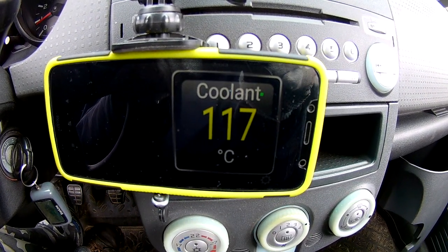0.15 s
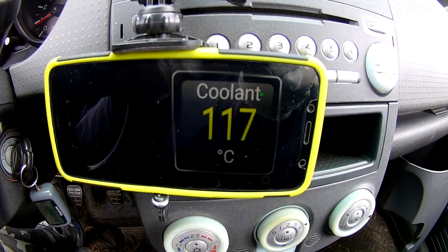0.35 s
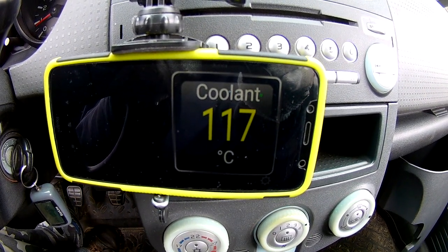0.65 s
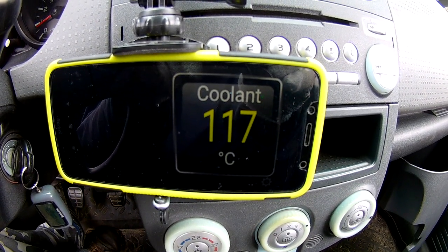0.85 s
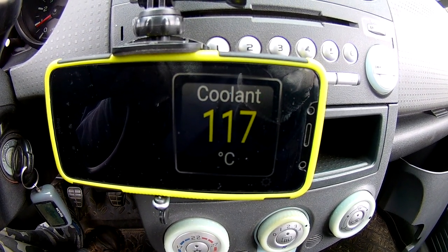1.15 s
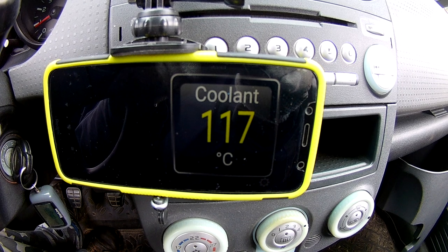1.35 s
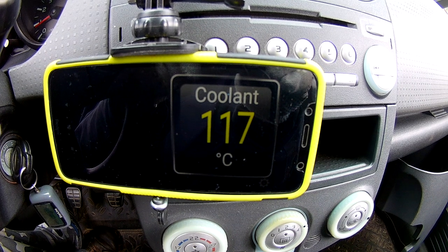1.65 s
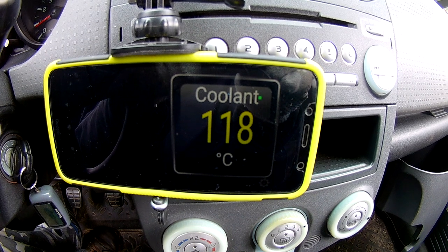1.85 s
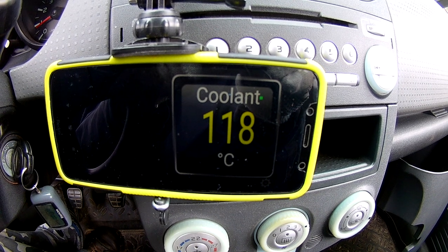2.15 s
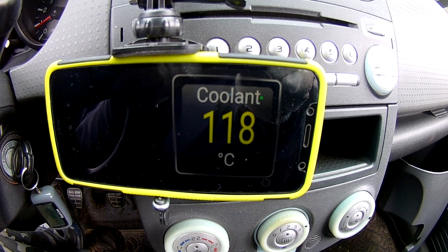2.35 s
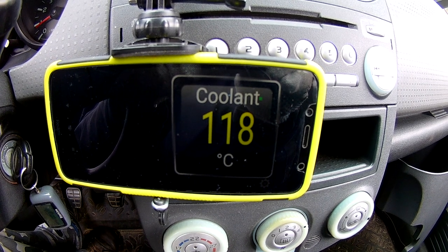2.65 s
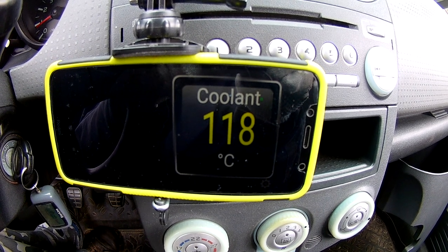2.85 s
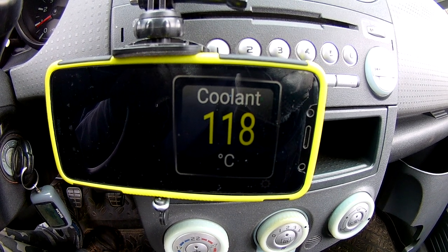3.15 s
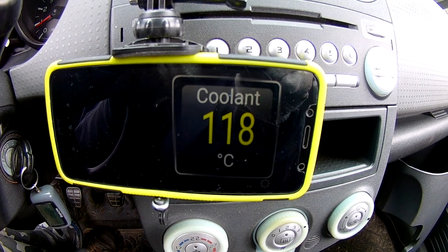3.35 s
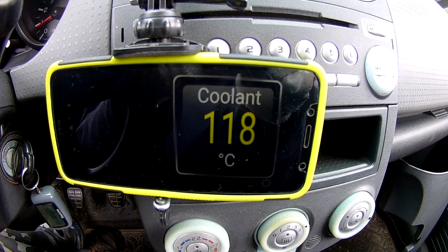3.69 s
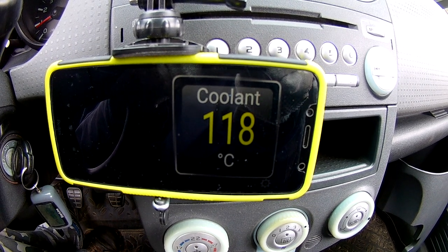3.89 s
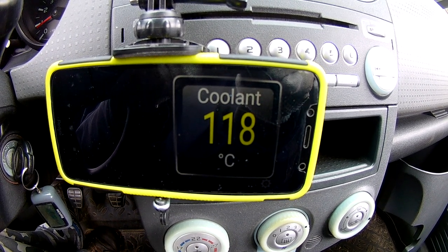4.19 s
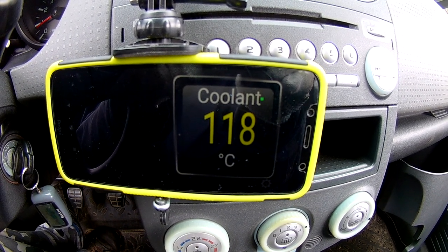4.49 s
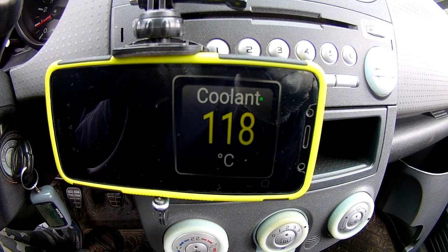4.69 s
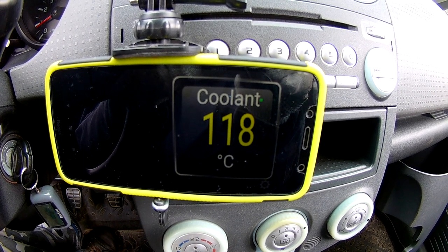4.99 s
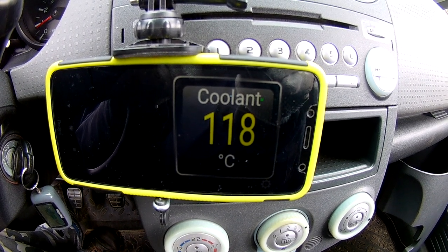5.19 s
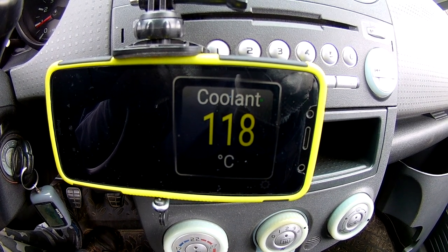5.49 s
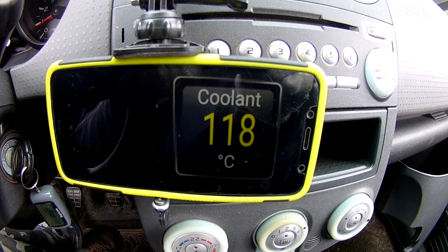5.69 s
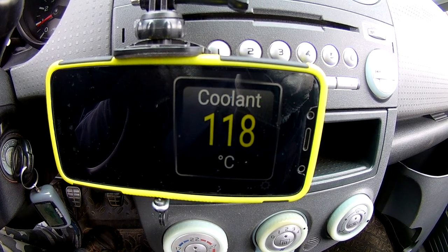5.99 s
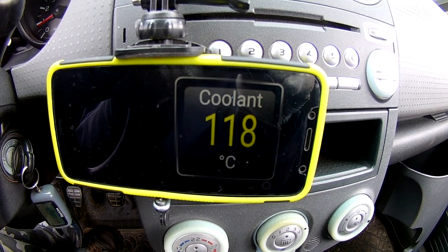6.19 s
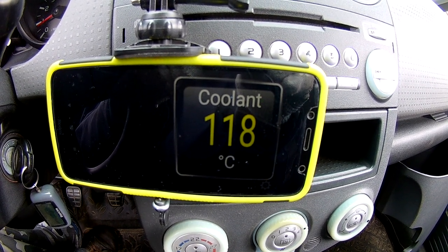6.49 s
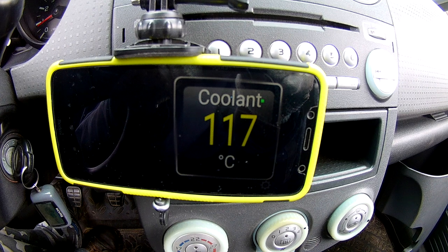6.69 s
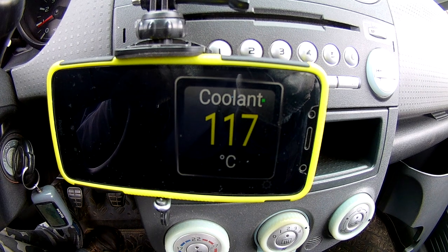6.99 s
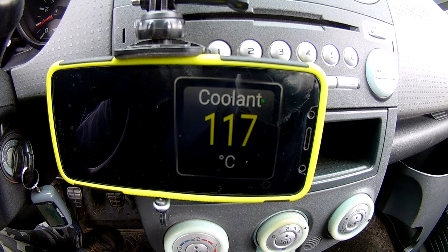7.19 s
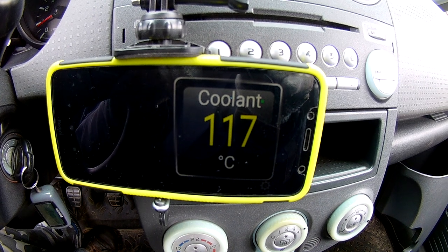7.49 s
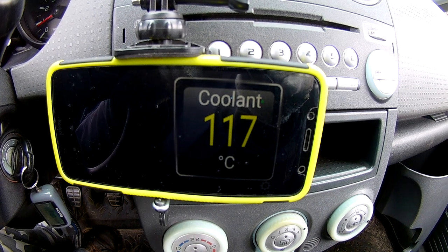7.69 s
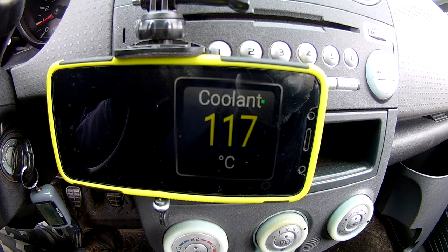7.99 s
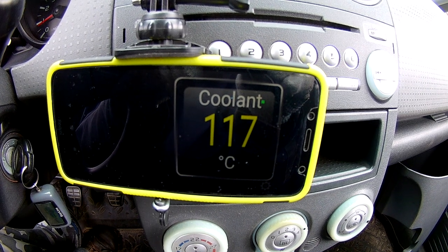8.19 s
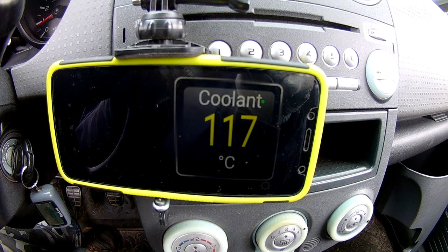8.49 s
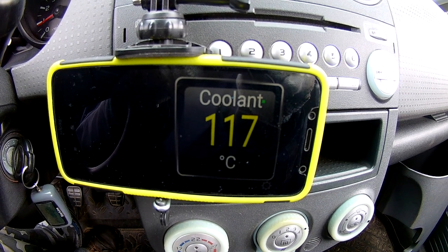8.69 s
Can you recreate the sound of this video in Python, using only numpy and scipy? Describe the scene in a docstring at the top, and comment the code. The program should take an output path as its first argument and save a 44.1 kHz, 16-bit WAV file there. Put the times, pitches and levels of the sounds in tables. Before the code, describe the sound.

Continuous blower noise in a small car cabin, heard from just in front of the vents in one channel. The airflow is dense and mostly low to midrange, with muffled highs and a boxy duct resonance. A deep steady hum sits below it, with slight low rumble from the idling engine. Only tiny surges and flutters vary the sound.

```python
"""Car heater blower at full speed

Heard from just in front of the dashboard: shaped noise makes the air rushing through ducts and vents,
with a faint whistle. Sine waves make the fan wheel's hum, once per turn and at whole multiples, and
the idling engine's drone. Low noise makes the cabin's boom; a faint microphone hiss lies over it all."""
import sys
import numpy as np
from scipy import signal
from scipy.fft import rfft, irfft
from scipy.io import wavfile

SR = 44100
rng = np.random.default_rng(int(sys.argv[2]) if len(sys.argv) > 2 else 0)


def dump(signal):
    """Clip the signal to [-1, 1] and save it as 16-bit WAV at the path in sys.argv[1]."""
    limited = np.clip(np.atleast_2d(signal).T, -1, 1)
    pcm = np.round(limited * 32767).astype(np.int16)
    wavfile.write(sys.argv[1], SR, pcm)


N = 390285  # length [samples]
FREQS = np.maximum(np.arange(N // 2 + 1) * SR / N, 1)  # frequencies of the spectrum [Hz], at least 1


def from_db(db):
    """Turn decibels into a gain."""
    return 10 ** (np.asarray(db) / 20)


def spectrum_db(points):
    """Join (frequency [Hz], level [dB]) points by straight lines on a log-frequency axis."""
    hz, db = np.transpose(points)
    return np.interp(np.log(FREQS), np.log(hz), db)


def level_gain(points):
    """Turn (time [s], level [dB]) points into a gain over time."""
    seconds, db = np.transpose(points)
    return from_db(np.interp(np.arange(N) / SR, seconds, db))


def noise(density_db):
    """Random noise with the given level per Hz at each frequency."""
    white = rfft(rng.standard_normal(N))
    return irfft(white * from_db(density_db), N) * np.sqrt(SR / 2)


def drift(rate_hz):
    """Slow random curve, mostly slower than the given rate, with mean 0 and standard deviation 1."""
    smoothing = 1 / (1 + (FREQS / rate_hz) ** 2) ** 2
    slow = irfft(rfft(rng.standard_normal(N)) * smoothing, N)
    return (slow - slow.mean()) / slow.std()


def wandering_angle(hz, wander, rate_hz):
    """Add up a wandering frequency into an angle [radians]; wander is a share of the frequency."""
    return 2 * np.pi * np.cumsum(hz * (1 + wander * drift(rate_hz))) / SR


def rotor(turn_hz, orders, wander, flutter_db):
    """A turning shaft: sines on multiples of its speed, which wanders a little, as does their level."""
    angle = wandering_angle(turn_hz, wander, rate_hz=1)
    tone = np.zeros(N)
    for multiple, db in orders:
        start = rng.uniform(0, 2 * np.pi)
        tone += from_db(db) * np.sin(multiple * angle + start)
    return np.sqrt(2) * tone * from_db(flutter_db * drift(4))  # sqrt(2): levels are rms


def swell(sound, hz, width_hz, gain):
    """Let one smooth-edged band of a sound follow a gain over time."""
    band = irfft(rfft(sound) * np.exp(-(2 * (FREQS - hz) / width_hz) ** 2), N)
    return sound + band * (gain - 1)


def cabin_boom():
    """Low boom of the cabin: deep noise whose level rises and falls."""
    # strength of the boom: (frequency [Hz], level per Hz before the changes over time [dB])
    boom_spectrum = [(8, -83.5), (15, -69), (28, -59), (44, -56.5), (49, -46), (54, -53.5), (60, -47),
                     (67, -49), (71, -52), (82, -54.5), (94, -56), (300, -150)]
    # change over time: (time [s], level [dB])
    boom_level = [(0, -1), (1.6, 0.5), (2.1, 2), (3.4, 0), (3.9, 0), (4.5, 0), (5.6, 1), (6.2, 1),
                  (7.5, -3)]
    return noise(spectrum_db(boom_spectrum)) * level_gain(boom_level)


def idling_engine():
    """Drone of the idling engine: slightly wavering tones on multiples of the crankshaft's turning rate."""
    # tones: (multiple of the crank rate, rms level before the flutter [dB])
    engine_orders = [(2, -51.5), (4, -54), (5, -46)]
    crank_hz = 12.8
    # the flutter swings evenly both ways, so its sign does not matter
    return rotor(crank_hz, engine_orders, wander=.012, flutter_db=-1)


def fan_wheel():
    """The slightly unbalanced wheel hums once per turn, with faint higher tones."""
    # tones: (multiple of the turning rate, rms level before flutter and changes over time [dB])
    wheel_orders = [(1, -27), (2, -48), (5, -55.5), (33, -74)]
    # change over time: (time [s], level [dB])
    wheel_level = [(0, -0.3), (1.5, -0.5), (3.5, 0.25), (8.1, 0), (8.8, -1.9)]
    wheel_hz = 73.95
    return rotor(wheel_hz, wheel_orders, wander=.0014, flutter_db=0.3) * level_gain(wheel_level)


def vent_whistle():
    """Air over a vent edge sings weakly on one duct resonance, its pitch and level flickering."""
    whistle_hz, wander = 1573, .011  # wander: share of the pitch
    level_db, flicker_db = -63, 5
    angle = wandering_angle(whistle_hz, wander, rate_hz=25)
    flicker = np.minimum(drift(5.7), 1.5)  # limits the loudest moments
    return np.sqrt(2) * np.sin(angle) * from_db(level_db + flicker_db * flicker)


def air_rush():
    """Turbulent air makes noise that rings in the ducts; some of its bands swell and flutter."""
    # turbulence of the air stream: (frequency [Hz], level per Hz before the ducts shape it [dB])
    air_spectrum = [(100, -61.5), (230, -76), (340, -74.5), (630, -77.5), (950, -73.5), (1400, -86.5),
                    (1750, -94), (2500, -87), (3430, -99.8), (4400, -92.5), (4800, -100.0), (5850, -105.9),
                    (6200, -113.0), (6600, -117.5), (7500, -120.7)]
    # resonances of fan housing, ducts and vents: (frequency [Hz], width at half the lift [Hz], lift [dB])
    duct_resonances = [(151, 14, 2.5), (170.8, 87.5, 11.5), (203, 16, 3.5), (267.6, 39, 12.5),
                       (294.8, 32.7, 5.5), (403, 58, 2), (430, 26, 1), (458, 173, 15.5), (486, 18, 1),
                       (571, 51, 6.5), (719, 169, 11.5), (860, 69, 2), (1041, 96, 5), (1259, 167, 5.5),
                       (1579, 304, 16), (1875, 190, 11.0), (2156, 290, 6.5), (2386, 163, 4.5),
                       (2673, 200, 5), (3085, 297, 10), (3704, 250, 5.5), (4220, 189, 1.5), (5160, 65, 3)]
    # hollow roar around a strong duct resonance: (time [s], level [dB])
    roar_level = [(0, -0.19), (1.4, -0.66), (2.1, 2), (2.7, -0.91), (3.7, 1.5), (5.5, -0.62), (6.6, .4),
                  (8.1, 1.2), (8.5, -2)]
    # swell and ebb of a low duct resonance: (time [s], level [dB])
    drone_level = [(0, 3.5), (1.1, 0), (2.3, -2.5), (2.8, 0.8), (3.5, -1.3), (4.6, 0.7), (6.2, -0.2),
                   (8.8, -0.9)]
    # eddies that make bands flutter: (frequency [Hz], width [Hz], flutter [dB])
    eddy_bands = [(726, 150, 0.78), (1000, 400, 0.6), (1570, 250, 0.9), (2600, 1600, 0.46)]
    low_hz, high_hz = 92, 7260  # edges of the rush
    eddy_rate_hz, surge_rate_hz, surge_db = 8, 3.1, 0.4

    lift_db = np.zeros(len(FREQS))
    for hz, width_hz, peak_db in duct_resonances:
        lift_db += peak_db / (1 + (2 * (FREQS - hz) / width_hz) ** 2)
    rush = noise(spectrum_db(air_spectrum) + lift_db)

    rush = swell(rush, hz=450, width_hz=130, gain=level_gain(roar_level))
    rush = swell(rush, hz=276, width_hz=56, gain=level_gain(drone_level))
    for hz, width_hz, flutter_db in eddy_bands:
        rush = swell(rush, hz, width_hz, from_db(flutter_db * drift(eddy_rate_hz)))

    rush = signal.sosfilt(signal.butter(4, low_hz, "high", fs=SR, output="sos"), rush)
    rush = signal.sosfilt(signal.butter(8, high_hz, fs=SR, output="sos"), rush)
    # the whole flow surges very slightly at random
    return rush * from_db(surge_db * drift(surge_rate_hz))


def scene():
    """Add up boom, engine, wheel, whistle and air into one channel."""
    mix = cabin_boom() + idling_engine() + fan_wheel() + vent_whistle() + air_rush()
    return mix[None, :]


def record(dry):
    """The microphone adds a faint hiss; a steep filter then cuts the top."""
    # hiss of the microphone: (frequency [Hz], level per Hz before the top is cut [dB])
    hiss_spectrum = [(5000, -126), (7800, -124), (8800, -120.5), (10000, -122), (12500, -122.5),
                     (15500, -119.5)]
    cutoff_hz = 15700
    heard = dry + noise(spectrum_db(hiss_spectrum))
    top_cut = signal.ellip(10, .1, 80, cutoff_hz, fs=SR, output="sos")
    return signal.sosfilt(top_cut, heard)


dry = scene()
out = record(dry)
dump(out)
```